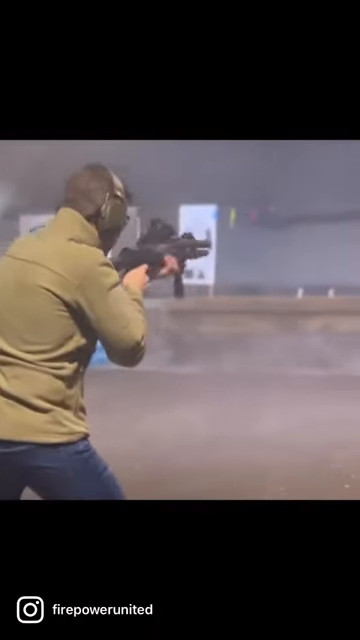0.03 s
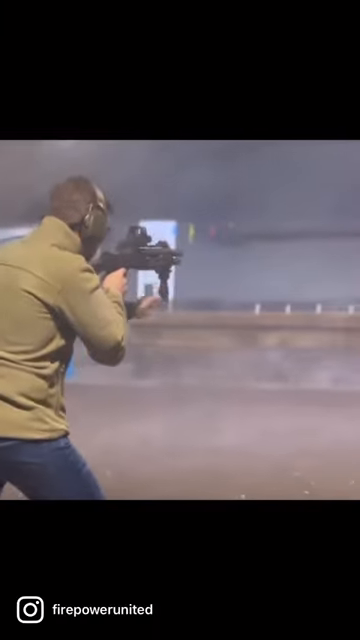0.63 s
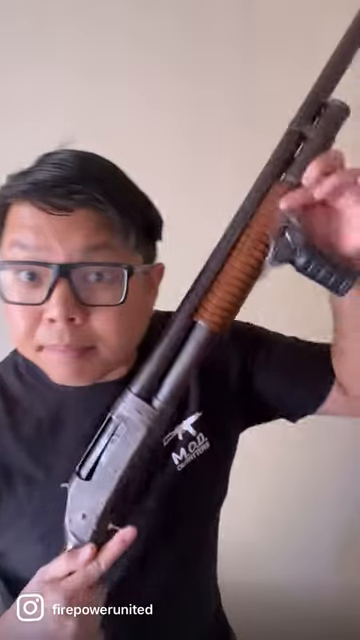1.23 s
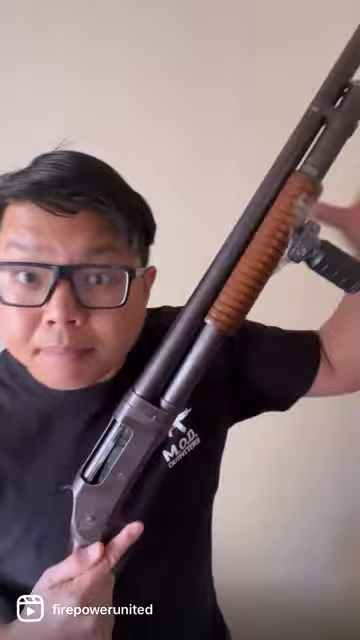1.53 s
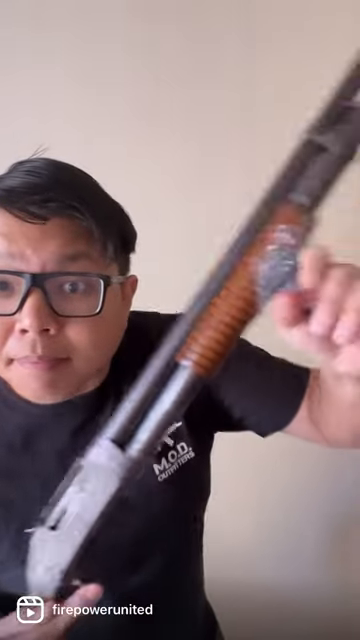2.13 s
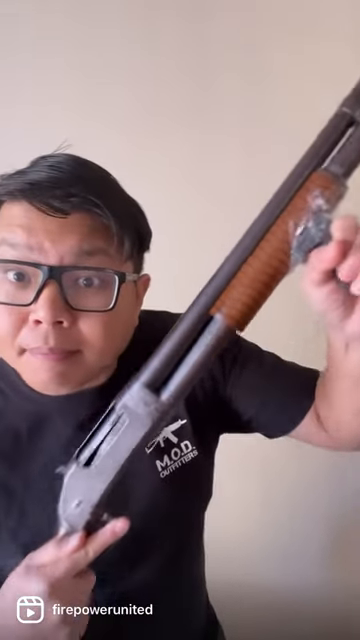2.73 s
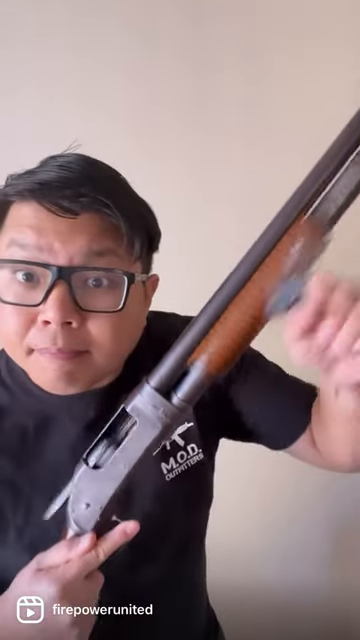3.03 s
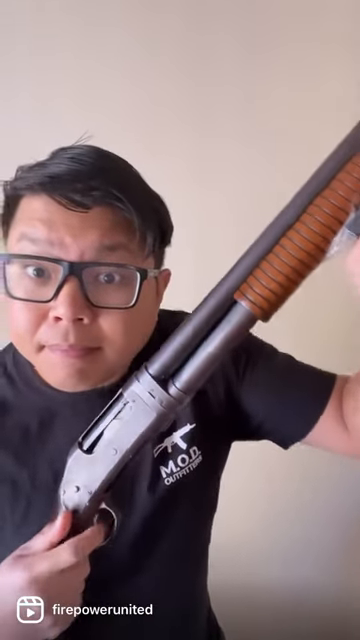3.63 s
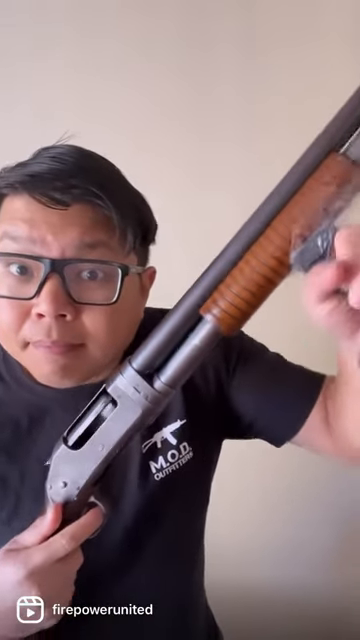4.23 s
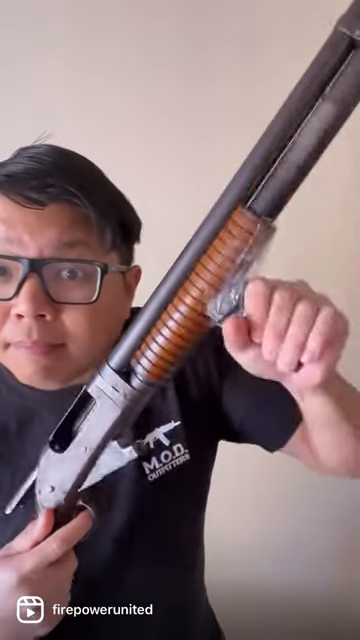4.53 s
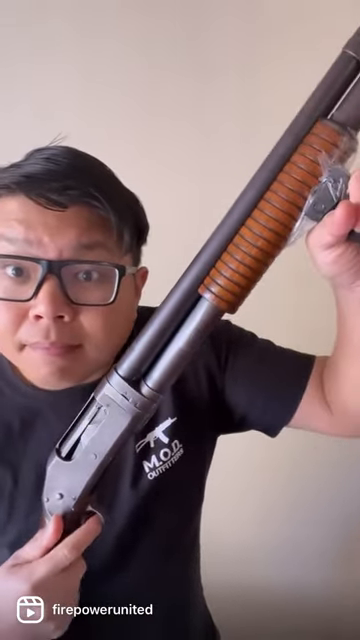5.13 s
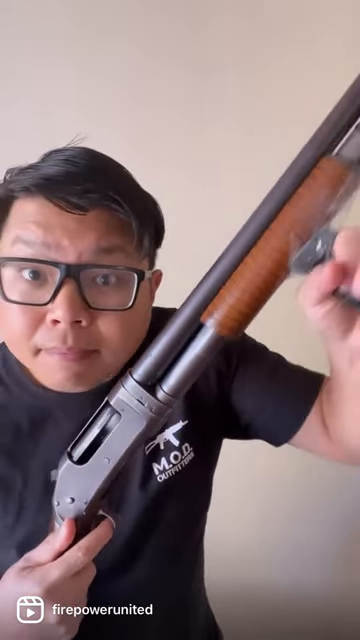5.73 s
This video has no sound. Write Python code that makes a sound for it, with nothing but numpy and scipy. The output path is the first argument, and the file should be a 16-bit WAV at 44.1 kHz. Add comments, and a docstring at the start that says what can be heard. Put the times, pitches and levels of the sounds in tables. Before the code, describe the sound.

The dull tail of a gunshot fades in an indoor range and cuts off. In a small, bare room, hands faintly rub and knock on a pump shotgun close to the microphone. The action is racked three times, with steel scraping, brief squeals and hard double clacks. Between rackings the hammer drops twice with a bright, dry snap. The metal rings faintly in a short room echo.

```python
"""In an indoor range, a gunshot dies away and stops short. Then, close up in a small bare room, hands rub
faintly on a pump shotgun and rack it three times: slide and bolt scrape, the bolt squeals, steel parts
click and slam on their stops, and twice the hammer drops. Each blow is a burst of tiny impacts that sets
steel and wood ringing. The gun rings on faintly, the room echoes, and a limiter holds down the peaks."""
import sys
import numpy as np
from scipy import signal
from scipy.fft import rfft, irfft, next_fast_len
from scipy.io import wavfile
from scipy.ndimage import uniform_filter1d, minimum_filter1d

SR = 44100
rng = np.random.default_rng(int(sys.argv[2]) if len(sys.argv) > 2 else 0)


def transcribe(signal):
    """Save signal, clipped to [-1, 1], as a 16-bit WAV file at the path in sys.argv[1]."""
    frames = np.atleast_2d(signal).T
    limited = np.clip(frames, -1, 1)
    pcm = np.round(limited * 32767).astype(np.int16)
    wavfile.write(sys.argv[1], SR, pcm)


N = 259749
TIME = np.arange(N) / SR


def from_db(db):
    """Turn decibels into a number to multiply by."""
    return 10 ** (np.asarray(db) / 20)


def rms_one(x):
    """Scale a sound so that its average strength (rms) is one."""
    return x / np.sqrt(np.mean(x ** 2) + 1e-20)


def at_hz(points, hz):
    """Read between the rows of a table, giving every octave equal space."""
    frequencies, values = np.transpose(points)
    return np.interp(np.log(hz + 1e-9), np.log(frequencies), values)


def colour(x, points):
    """Turn lows and highs up or down by a table of (frequency [Hz], level [dB])."""
    size = next_fast_len(x.shape[-1])
    gain = from_db(at_hz(points, np.fft.rfftfreq(size, 1 / SR)))
    return irfft(rfft(x, size) * gain, size)[..., :x.shape[-1]]


def stereo(mid, side):
    """Make left and right from what they share (mid) and how they differ (side)."""
    return np.array([mid + side, mid - side])


def high_pass(x, hz):
    """Turn down everything below this frequency."""
    return signal.sosfilt(signal.butter(2, hz, "high", fs=SR, output="sos"), x)


def resonate(x, modes):
    """Ring an object's own notes (modes), flipping every other one; wider notes die sooner."""
    out = 0
    for k, (hz, width, db) in enumerate(modes):
        r = np.exp(-np.pi * width / SR)
        feedback = [1, -2 * r * np.cos(2 * np.pi * hz / SR), r * r]
        note = signal.lfilter(np.array([1, 0, -1]) * (1 - r * r) / 2, feedback, x)
        out = out + (-1) ** k * from_db(db) * note
    return out


# the tone of the shot's roar: (frequency [Hz], relative level [dB])
ROAR_TONE = [(24, -40), (40, -10), (200, 1.5), (291, -0.5), (627, -1), (765, -9), (1140, -14.5),
             (1460, -20), (4130, -35), (4560, -34), (8910, -38.5), (12600, -51), (15000, -64)]
# how wide the roar sounds: (frequency [Hz], side compared with mid [dB])
ROAR_WIDTH = [(60, -26), (240, -9), (950, -1), (3770, -1), (15000, -2)]
# how the roar fades: (time [s], level [dB])
ROAR_FADE = [(0, -39), (.15, -42), (.35, -47), (.58, -58.5)]
def shot_roar():
    """The dull roar of a shot fades in a large hall."""
    mid, side = (rms_one(colour(rng.standard_normal(N), ROAR_TONE)) for _ in range(2))
    level = from_db(np.interp(TIME, *np.transpose(ROAR_FADE)))
    return level * stereo(mid, colour(side, ROAR_WIDTH))


# the short notes of a gun's working steel: (pitch [Hz], width [Hz], relative level [dB])
STEEL_MODES = [(3030, 980, -8), (3770, 246, -2.5), (4168, 410, -2.5), (4700, 570, -1.5), (5480, 630, -2),
               (6000, 220, 1.5), (6650, 610, -2)]
# the higher notes of its small parts: (pitch [Hz], width [Hz], relative level [dB])
SMALL_PART_MODES = [(7600, 480, -4), (8710, 380, 5.5), (9540, 1600, -3), (14000, 6100, -6.5),
                    (14700, 7200, -13)]
# clinks out in the range: (time [s], level [dB], time to fade by 60 dB [s])
RANGE_CLINKS = [(0.185, -47.5, 0.3), (.469, -62, .012)]
def range_clinks():
    """Two thin metal clinks sound through the roar and die away with their echo."""
    bright = resonate(rng.standard_normal((2, N)), SMALL_PART_MODES)
    steel = resonate(rng.standard_normal((2, N)), STEEL_MODES)
    level = sum((TIME > s) * from_db(db) * np.exp(-np.log(1000) * np.abs(TIME - s) / fade_s)
                for s, db, fade_s in RANGE_CLINKS)
    return level * rms_one(bright + steel)


def shot_tail(end_s=0.586):
    """The roar and its clinks stop short."""
    return (shot_roar() + range_clinks()) * np.clip((end_s - TIME) / 0.004, 0, 1)


# the tone of the quiet room: (frequency [Hz], relative level [dB])
HUSH_TONE = [(15, -28.5), (25, -3.5), (88, -0.5), (543, -24), (769, -33), (1630, -25), (1910, -37.5),
             (2240, -27), (2500, -36.5), (6040, -30), (15000, -46.5)]
# how its loudness drifts: (time [s], level [dB])
HUSH_LEVEL = [(.65, -69.5), (.8, -66), (1.2, -69.5), (1.6, -59.5), (2.4, -58.5), (3.5, -66), (5.0, -67.5),
              (5.89, -62)]
def room_tone(start_s=0.655, side_db=-14):
    """The small room comes in as a faint low rumble under a thin hiss."""
    mid, side = (rms_one(colour(rng.standard_normal(N), HUSH_TONE)) for _ in range(2))
    level = from_db(np.interp(TIME, *np.transpose(HUSH_LEVEL)))
    fade_in = np.clip((TIME - start_s) / 0.011, 0, 1)
    return level * fade_in * stereo(mid, from_db(side_db) * side)


def gate(time, start, end, edge_s):
    """Fade on at the start and off at the end."""
    return np.clip(np.minimum(time - start, end - time) / edge_s + .5, 0, 1)


# faint rubs of hands on the gun (first three rows), then strokes of steel sliding on steel:
# (start [s], end [s], level at the end [dB])
RUBS = [(0.748, 1.046, -70), (1.273, 1.583, -62.5), (2.1, 2.457, -63.5), (2.538, 2.62, -54.5),
        (1.865, 1.892, -23), (2.634, 2.692, -27.5), (2.837, 2.944, -30), (3.104, 3.165, -25.5),
        (3.195, 3.311, -24), (3.964, 4.014, -41), (4.022, 4.084, -25.5), (4.225, 4.277, -34.5),
        (4.486, 4.684, -33), (5.151, 5.183, -47.5), (5.439, 5.544, -31.5), (5.621, 5.739, -33)]
def rub_pressure(swell_db=9, edge_s=0.008):
    """How hard the hands or the steel rub: harder as each rub goes on."""
    pressure = np.zeros(N)
    for start, end, db in RUBS:
        during = slice(int((start - edge_s) * SR), int((end + edge_s) * SR))
        level = from_db(db - np.interp(TIME[during], [start, end], [swell_db, 0]))
        pressure[during] += gate(TIME[during], start, end, edge_s) * level
    return pressure


# the low, short notes of stock and fore-end (the grip): (pitch [Hz], width [Hz], relative level [dB])
BODY_MODES = [(216, 74, -16), (400, 150, -17.5), (682, 260, -6.5), (855, 210, -4), (1203, 318, -5),
              (1589, 220, 3), (2060, 600, -3)]
def scrape(pressure, snags_per_s=1800, spread_db=4.0, knock_db=-9, tick_db=-9):
    """Rubbing and rattling make many tiny, uneven snags that ring the steel, body and small parts."""
    snags = (rng.random(N) < snags_per_s / SR) * rng.choice([-1, 1], N)
    strength = from_db(spread_db * np.minimum(rng.exponential(1, N), 4))
    force = snags * strength + 0.17 * rng.standard_normal(N)
    clink, knock, tick = (rms_one(resonate(force, modes))
                          for modes in (STEEL_MODES, BODY_MODES, SMALL_PART_MODES))
    return pressure * (high_pass(clink, hz=2250) + from_db(knock_db) * knock + from_db(tick_db) * tick)


# barrel, magazine tube and spring: (pitch [Hz], relative level [dB], time to fade by 60 dB [s])
LONG_NOTES = [(1435, -67, 1.83), (1410, -63.5, 1.9), (1574.4, -61.5, 3), (1677, -60.5, 0.98),
              (1787, -65, 3.9), (1880, -53.5, 0.6), (1990, -63, 0.69), (1990, -64, .7), (4350, -62, 1.3),
              (6450, -53.5, 0.44)]
def ringing(x, ring_db=-10.5):
    """The tubes and the spring keep sounding after each scrape or blow."""
    out = 0
    for hz, db, fade_s in LONG_NOTES:
        r = np.exp(-np.log(1000) / (fade_s * SR))
        step = 2 * np.pi * hz / SR
        note = signal.lfilter([0, np.sin(step)], [1, -2 * r * np.cos(step), r * r], x + 1e-18)
        out = out + from_db(db + ring_db) * note
    return out


# how the microphone's two openings differ: (frequency [Hz], side compared with mid [dB])
MIC_WIDTH = [(200, -5.5), (1500, -20.5), (2800, -4), (3900, -23), (5400, -16.5), (7000, -11.5), (8200, 0),
             (9300, -3.5), (10000, -1), (12000, -24), (15000, -0.5)]
def microphone(x, sway=0.089, size=128, sway_points=90):
    """Close sound reaches the two openings out of step; balance and timing sway as the gun moves."""
    quarter_turn = irfft(1j * from_db(at_hz(MIC_WIDTH, np.fft.rfftfreq(size, 1 / SR))))
    shifter = np.fft.fftshift(quarter_turn) * np.hanning(size)   # moves each wave by a quarter cycle
    shifted = np.convolve(x, shifter)[size // 2:size // 2 + N]
    lean, twist = (np.interp(TIME, np.linspace(0, N / SR, sway_points), draw)
                   for draw in rng.standard_normal((2, sway_points)))
    return stereo(x, sway * lean * x + (1 + 0.27 * twist) * shifted)


# how loud the small room's echo is: (frequency [Hz], level [dB])
ECHO_TONE = [(100, -4), (210, 0), (350, -1.5), (650, -4.5), (1050, -4.5), (1600, -4), (2100, 4), (3000, -3),
             (4500, -9), (6500, -9), (9000, -9.5), (15000, -10)]
# how long it lasts: (frequency [Hz], time to fade by 60 dB [s])
ECHO_FADE = [(200, 0.48), (530, 0.41), (1100, 0.44), (1600, 0.74), (2600, 0.53), (4500, 0.68), (9700, 0.47),
             (15000, 0.27)]
# how wide it sounds: (frequency [Hz], side compared with mid [dB])
ECHO_WIDTH = [(100, -19), (700, -7), (1400, -8), (2600, -6), (4400, -12.5), (6500, -15.5), (8600, 3.5),
              (11000, -25), (15000, -5.5)]
def room_echo(x, gap_s=0.00053, build_s=0.002, bands=25):
    """After a short gap the walls answer with a dense echo; each band of pitches fades at its own pace."""
    age, hz = TIME[:SR], np.fft.rfftfreq(SR, 1 / SR)
    centres = np.geomspace(60, 17000, bands)
    onset = np.clip((age - gap_s) / build_s, 0, 1)
    noise_spectrum = rfft(rng.standard_normal((2, SR)))
    tail = 0
    for k, centre in enumerate(centres):
        share = np.interp(np.log(hz + 1), np.log(centres), np.arange(bands) == k)
        decay = onset * np.exp(-np.log(1000) * age / at_hz(ECHO_FADE, centre))
        mid_side_db = at_hz(ECHO_TONE, centre) + np.array([[0], [at_hz(ECHO_WIDTH, centre)]])
        band = irfft(noise_spectrum * share, SR)
        tail = tail + band * rms_one(decay) / np.sqrt(SR) * from_db(mid_side_db)
    return signal.fftconvolve(stereo(*tail), x[None], axes=1)[:, :N]


def chatter(chatter_s, size, settle_s=0.023, settle_db=-21):
    """A burst of tiny impacts swells and dies, then the loose part buzzes weakly as it settles."""
    age = np.arange(size) / SR
    progress = age / chatter_s
    swell = 2 * progress * np.exp(1 - 2 * progress)
    settle = from_db(settle_db) * (1 - np.exp(-progress)) * np.exp(-age / settle_s)
    return rng.choice([-1, 1], size) * np.hypot(swell, settle)


def contact(modes, chatter_s, low_hz, vary_db, detune, size=2400):
    """The burst rings one group of notes, a little differently wherever it lands."""
    draws = rng.standard_normal((len(modes), 2))
    struck = [(hz * (1 + detune * pitch_draw), width, db + vary_db * level_draw)
              for (hz, width, db), (pitch_draw, level_draw) in zip(modes, draws)]
    sound = high_pass(resonate(chatter(chatter_s, size), struck), low_hz)
    return rms_one(sound) * np.sqrt(SR / 1000 / size)   # as much energy as 1 ms at strength one


def clack(s, db, knock_db, tick_db, chatter_s, part_hz, part_db, wood_below_hz=1100):
    """One blow, as (start sample, sound): a steel clink, plus a tick and a knock set relative to it."""
    # steel notes near the struck part's own pitch are louder
    steel = [(hz, width, level + part_db * np.exp(-((hz - part_hz) / 450) ** 2))
             for hz, width, level in STEEL_MODES]
    # the heavier the knock, the more it reaches the deep notes of the wood
    wood_db = 0.17 * (knock_db + 4)
    body = [(hz, width, level + (hz < wood_below_hz) * wood_db) for hz, width, level in BODY_MODES]
    clink = contact(steel, chatter_s, low_hz=2520, vary_db=3.5, detune=0.035)
    tick = contact(SMALL_PART_MODES, chatter_s, low_hz=6500, vary_db=-1.0, detune=0.013)
    knock = contact(body, chatter_s * 2.14, low_hz=164, vary_db=3.5, detune=0.025)
    blow = clink + from_db(tick_db) * tick + from_db(knock_db) * knock
    start = int((s - .75 * chatter_s - .0003) * SR)   # early: the force takes a moment to peak
    return start, from_db(db) * blow


# ticks of small parts: (time [s], level [dB])
TICKS = [(0.794, -44), (0.9099, -45.5), (1.0088, -51.5), (1.29, -43), (2.083, -29), (2.193, -41),
         (2.2482, -38.5), (2.312, -41.5), (2.62, -31), (3.573, -27.5), (3.645, -30.5), (4.021, -31)]
def handling_ticks():
    """Small parts tick thinly as the gun is moved."""
    return [clack(s, db, knock_db=-11.5, tick_db=-6, chatter_s=.0012, part_hz=6200, part_db=5.5)
            for s, db in TICKS]


# knocks of the fore-end: (time [s], clink level [dB], knock compared with clink [dB])
FORE_END_KNOCKS = [(1.279, -50, 8.5), (1.362, -26, -7), (1.3818, -27.5, -1), (1.4721, -29, -4),
                   (1.5044, -40, -0.5), (1.542, -39.5, 3), (1.6743, -36.5, -0.5), (1.738, -53, 5),
                   (1.8572, -26, 4)]
def fore_end_knocks():
    """The loose fore-end knocks about dully under the hand."""
    return [clack(s, db, knock_db, tick_db=-18, chatter_s=.0018, part_hz=6500, part_db=5)
            for s, db, knock_db in FORE_END_KNOCKS]


# double blows that end a stroke: (time [s], slide level [dB], bolt delay [s], bolt level [dB],
# knock compared with clink [dB], pitch of the part [Hz], rattle level [dB])
SLAMS = [(1.89, -7, .0047, -8, -7, 6000, -26.5), (2.6879, -1, 0.0044, -7, -12.5, 5900, -17),
         (2.946, -4, .016, -4.5, -6, 4200, -17.5), (3.288, -1.5, 0.015, -7.5, -10.5, 5450, -22.5),
         (4.078, -9, .005, -10, -11.5, 4400, -22.5), (4.2811, -14.5, 0.017, -6, -4.5, 6500, -16),
         (4.6744, -5.5, 0.016, -5, -15.5, 4350, -22), (5.715, -9.5, .016, -6, -4.5, 4400, -22.5)]
def slams():
    """The slide hits its stop and the bolt slams home just after."""
    blows = []
    for s, slide_db, delay_s, bolt_db, knock_db, hz, _ in SLAMS:
        slide = clack(s, slide_db, knock_db, tick_db=-10.5, chatter_s=.001609, part_hz=hz, part_db=6.5)
        bolt = clack(s + delay_s, bolt_db, knock_db, tick_db=-9, chatter_s=.0023, part_hz=hz, part_db=6)
        blows += [slide, bolt]
    return blows


def rattle_pressure(decay_s=0.028):
    """How hard the steel rattles: it dies away quickly after each slam."""
    pressure = np.zeros(N)
    for s, *_, rattle_db in SLAMS:
        start = int(s * SR)
        pressure[start:] += from_db(rattle_db) * np.exp(-TIME[:N - start] / decay_s)
    return pressure


# snaps of the latches: (time [s], level [dB], pitch of the part [Hz])
LATCH_SNAPS = [(2.641, -14.5, 6500), (2.8231, -9, 4840), (2.8739, -11, 6830), (2.893, -10.5, 5200),
               (4.1023, -8.5, 4900), (4.224, -12, 6500), (4.236, -8.5, 4660), (5.6273, -7.5, 4830),
               (5.659, -16.5, 4700), (5.67, -8.5, 4700)]
def latch_snaps():
    """Spring-loaded latches snap crisply as the bolt unlocks and cocks the hammer."""
    return [clack(s, db, knock_db=-23, tick_db=-12, chatter_s=.0012, part_hz=hz, part_db=10.5)
            for s, db, hz in LATCH_SNAPS]


# parts catching along a stroke: (time [s], clink level [dB], knock compared with clink [dB])
CATCHES = [(2.6673, -17, -4.5), (2.7063, -15.5, -4), (2.7144, -16.5, -3), (2.736, -12.5, -14),
           (3.113, -17.5, -10.5), (3.2005, -25, -5), (3.217, -12.5, -10), (3.2413, -9, -6.5),
           (3.275, -12.5, -7), (4.033, -19, -5), (4.045, -17.5, -1.5), (4.5228, -19.5, -5.5),
           (4.592, -17, -12), (4.6191, -19, -7.5), (4.627, -21, -8.5), (4.66, -21.5, -8),
           (5.444, -25, -8.5), (5.52, -15, -9.5)]
def catches():
    """The bar that pulls the bolt and the carrier that lifts the shell catch with blunt clacks."""
    return [clack(s, db, knock_db, tick_db=-7, chatter_s=.0024, part_hz=6300, part_db=1)
            for s, db, knock_db in CATCHES]


# squeals of the bolt: (start [s], end [s], start pitch [Hz], end pitch [Hz], level [dB])
BOLT_SQUEALS = [(2.837, 2.948, 4900, 4420, -32.5), (4.228, 4.28, 4580, 4710, -46.5),
                (5.623, 5.708, 4900, 4700, -43)]
def bolt_squeals(width_hz=260, edge_s=0.0074):
    """The bolt sticks and slips as it rides back over the hammer, making one shaky, gliding note."""
    smoothing = signal.butter(2, width_hz / 2, fs=SR, output="sos")
    wobble = signal.sosfilt(smoothing, rng.standard_normal((2, N)))
    out = np.zeros(N)
    for start, end, start_hz, end_hz, db in BOLT_SQUEALS:
        phase = 2 * np.pi * np.cumsum(np.interp(TIME, [start, end], [start_hz, end_hz])) / SR
        note = rms_one(wobble[0] * np.cos(phase) + wobble[1] * np.sin(phase))
        out += from_db(db) * gate(TIME, start, end, edge_s) * note
    return out


# drops of the hammer: (time [s], level [dB], sear level [dB], thump pitch [Hz], thump level [dB])
HAMMER_DROPS = [(3.7785, -1.5, -10, 100.7, -35), (5.1781, -3.5, -20, 113, -46.5)]
def hammer_snaps(sear_lead_s=0.0065):
    """The sear (the hook holding the hammer) lets go with a click; the hammer snaps down brightly."""
    blows = []
    for s, db, sear_db, _, _ in HAMMER_DROPS:
        sear = clack(s - sear_lead_s, sear_db, knock_db=-13.5, tick_db=-14, chatter_s=.00112,
                     part_hz=6000, part_db=1.5)
        hammer = clack(s, db, knock_db=-12, tick_db=-4.5, chatter_s=.0023, part_hz=6000, part_db=5.5)
        blows += [sear, hammer]
    return blows


def hammer_thumps(rise_s=0.0039, sag_s=0.041, lag_s=0.0023):
    """The hammer jolts the stock: a short, dull thump that sinks in pitch."""
    out = np.zeros(N)
    for s, _, _, hz, db in HAMMER_DROPS:
        age = np.maximum(TIME - s - lag_s, 0)
        swell = age / rise_s * np.exp(1 - age / rise_s)
        phase = 2 * np.pi * hz * sag_s * (1 - np.exp(-age / sag_s))
        out += from_db(db) * swell * np.sin(phase)
    return out


def shotgun():
    """The gun's blows, scrapes, squeals and ringing in one direction; each call differs a little."""
    blows = handling_ticks() + fore_end_knocks() + catches() + latch_snaps() + slams() + hammer_snaps()
    clacks = np.zeros(N + SR)
    for start, blow in blows:
        clacks[start:start + len(blow)] += blow
    sound = clacks[:N] + scrape(rub_pressure() + rattle_pressure()) + bolt_squeals()
    return sound + ringing(sound)


def scene():
    """The fading shot, then the gun close by in its small room."""
    forward, sideways = shotgun(), shotgun()
    echoes = (room_echo(forward) + room_echo(sideways)) / np.sqrt(2)
    return microphone(forward) + echoes + high_pass(hammer_thumps() + room_tone(), hz=30) + shot_tail()


def record(dry, ceiling_db=-2.0, release_db_per_s=700, smooth_samples=45, cutoff_hz=16300):
    """A fast limiter turns down the sharpest peaks, then the highest treble is cut."""
    over_db = np.maximum(20 * np.log10(np.abs(dry).max(axis=0) + 1e-9) - ceiling_db, 0)
    held_db = np.maximum.accumulate(over_db + release_db_per_s * TIME) - release_db_per_s * TIME
    gain_db = uniform_filter1d(minimum_filter1d(-held_db, smooth_samples), smooth_samples)
    treble_cut = signal.ellip(10, .2, 80, cutoff_hz, fs=SR, output="sos")
    return signal.sosfilt(treble_cut, dry * from_db(gain_db))


dry = scene()
out = record(dry)
transcribe(out)
```